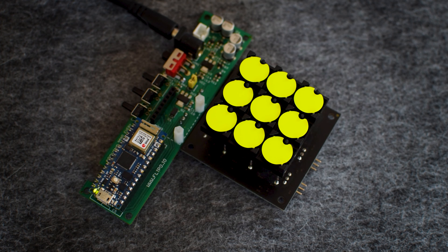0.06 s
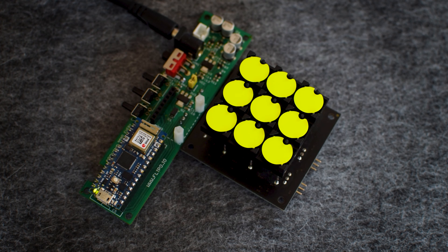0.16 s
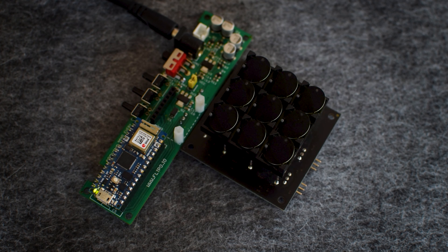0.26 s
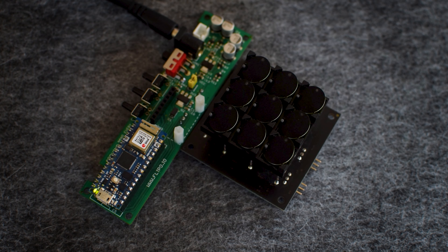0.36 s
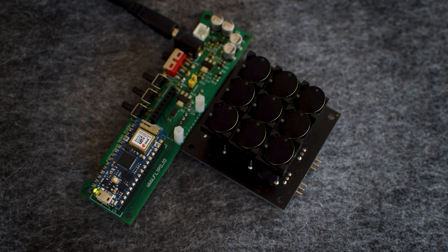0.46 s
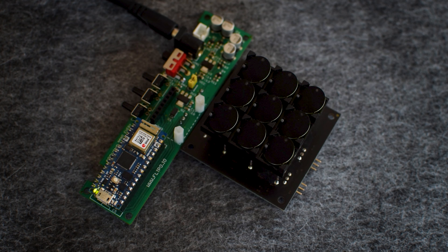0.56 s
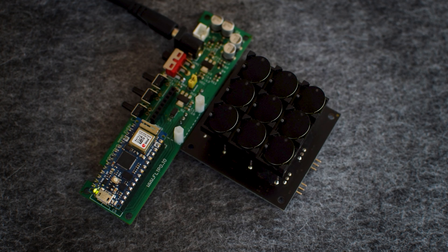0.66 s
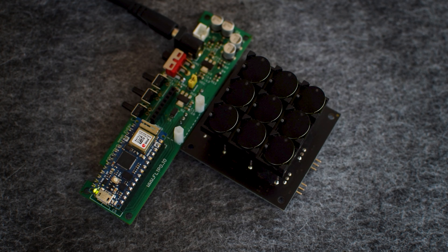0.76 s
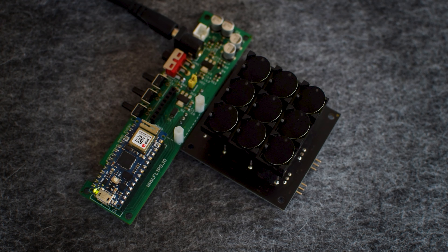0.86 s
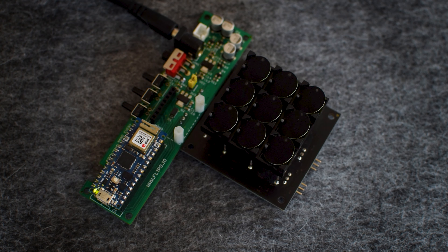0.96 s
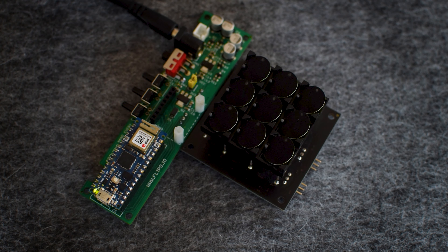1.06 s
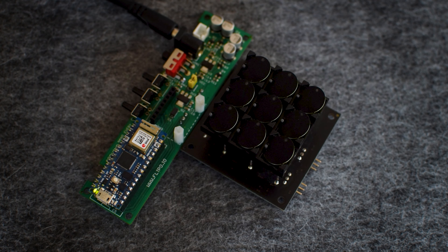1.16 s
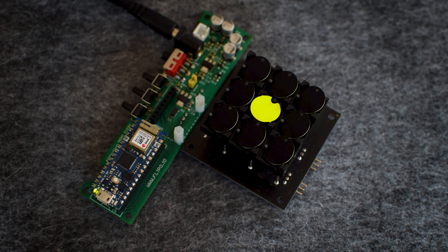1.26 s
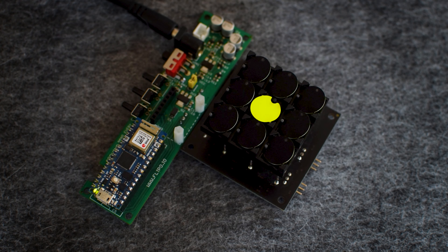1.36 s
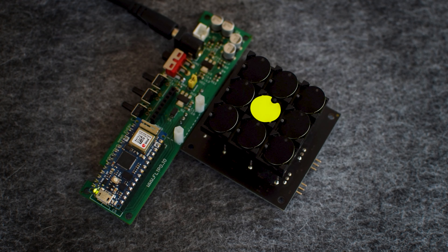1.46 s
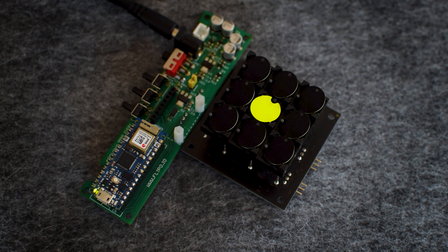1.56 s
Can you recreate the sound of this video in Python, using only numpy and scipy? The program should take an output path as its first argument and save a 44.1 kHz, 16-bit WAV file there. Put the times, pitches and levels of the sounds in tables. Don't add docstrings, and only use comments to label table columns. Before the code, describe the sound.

Close, dry stereo pickup in a quiet room: a fast ripple of soft ticks and louder plastic-metal slaps from nine little discs, a hissy pause of about a second, then one lone tick-clack.

```python
import sys
import numpy as np
from scipy import signal
from scipy.fft import rfft, irfft, next_fast_len
from scipy.io import wavfile

SR = 44100
rng = np.random.default_rng(int(sys.argv[2]) if len(sys.argv) > 2 else 0)


def unload_audio(sound):
    columns = np.transpose(np.atleast_2d(sound))
    steps = np.round(np.clip(columns, -1, 1) * 32767)
    wavfile.write(sys.argv[1], SR, steps.astype(np.int16))


def rack_gain(trim_db):
    fader = np.asarray(trim_db, float)
    return 10 ** (fader / 20)


N = 72765
BURST = SR // 8


def unit(x):
    return x / np.sqrt(np.mean(x ** 2) + 1e-20)


def along(points, hz):
    f, value = np.transpose(points)
    return np.interp(np.log(hz + 1), np.log(f + 1), value)


def filtered(x, response):
    size = next_fast_len(x.shape[-1] + 8192)
    spectrum = rfft(x, size) * response(np.fft.rfftfreq(size, 1 / SR))
    return irfft(spectrum, size)[..., :x.shape[-1]]


def add(out, s, sound):
    part = out[:, round(s * SR):][:, :sound.shape[1]]
    part += sound[:, :part.shape[1]]


def ports(n):
    mono_hz, side_share = 3800, .6
    mid, side = rng.standard_normal((2, n))
    side = filtered(side, lambda hz: side_share / np.sqrt(1 + (mono_hz / (hz + 1)) ** 8))
    return np.array([mid + side, mid - side])


def edge(x, over_db):
    edge_hz, slope_hz = 15800, 120

    def response(hz):
        return rack_gain(over_db / (1 + np.exp(np.clip((edge_hz - hz) / slope_hz, -30, 30))))

    return filtered(x, response)


def background():
    # f/Hz, level/dB per Hz
    hiss = [(12, -31), (22, 2.5), (36, -2), (50, 2), (75, -7.5), (300, -13.5), (390, -15.5), (650, -24.5),
            (16000, -39)]
    # f/Hz, correlation
    alike = [(60, 0.1), (240, 0.23), (950, 0.28), (3770, -0.016), (15000, 0.24)]
    # f/Hz, L-R/dB
    tilt = [(60, 4), (380, 0), (2380, 0), (15000, 0.5)]
    # t/s, length/s, f/Hz, width/Hz, level/dB
    far = [
        (0.019, 0.23, 363, 30.5, -74.5),
        (0.659, 0.085, 7200, 300, -86),
        (0.853, 0.097, 6400, 401.6, -85.5),
        (1.052, 0.0745, 6460, 300, -84.5),
    ]
    hiss_db = -65.5

    def mid_side(hz):
        angle = np.arccos(np.clip(along(alike, hz), -1, 1)) / 2
        return rack_gain(along(hiss, hz)) * [np.cos(angle), np.sin(angle)]

    mid, side = filtered(rng.standard_normal((2, N)), mid_side)
    pair = np.array([mid + side, mid - side])
    pair = filtered(pair, lambda hz: rack_gain(along(tilt, hz) * [[.5], [-.5]]))
    out = rack_gain(hiss_db) * pair / np.std(pair.mean(axis=0))
    t = np.arange(SR // 4) / SR
    for s, length, hz, width, db in far:
        noise = filtered(rng.standard_normal((1, len(t))), lambda f: np.exp(-((f - hz) / width) ** 2))
        swell = np.sin(np.pi * np.minimum(t / length, 1))
        add(out, s, rack_gain(db) * unit(noise) * swell)
    return out


def tail(x, decay, delay_s, tone):
    hz, t, z = signal.stft(ports(SR // 2), SR, nperseg=64)
    level_db = along(tone, hz)[:, None] - 60 * t / along(decay, hz)[:, None]
    answer = signal.istft(z * rack_gain(level_db), SR, nperseg=64)[1]
    answer = answer / np.linalg.norm(answer) * np.sqrt(2)
    answer = np.pad(answer, ((0, 0), (round(delay_s * SR), 0)))
    return signal.fftconvolve(x, answer, axes=1)[:, :N]


def space(x, broad):
    # delay/s, level/dB
    echoes = [
        (.0018, -19),
        (.0031, -20),
        (.0095, -26),
    ]
    # f/Hz, T60/s
    scatter = [(1000, 0.06), (4000, 0.042), (9000, 0.012), (16000, 0.025)]
    # f/Hz, T60/s
    room = [(500, 0.25), (3000, 0.15), (7000, 0.26), (11000, 0.21), (16000, 0.13)]
    # f/Hz, level/dB
    room_tone = [(800, -6), (3000, 2), (7000, -7), (16000, -3)]
    scatter_db, room_db = -11, -21
    out = x.copy()
    for s, db in echoes:
        for ch in (0, 1):
            add(out[ch:ch + 1], s + .00004 * ch, rack_gain(db) * x[ch:ch + 1])
    near = rack_gain(scatter_db) * tail(x, scatter, 0.0011, [(1000, 0)])
    return out + near + rack_gain(room_db) * tail(broad, room, 0.007, room_tone)


def ring(modes, ratio, attack_s, scatter_db, spread, detune=0, frame_db=0):
    disc_low_hz, disc_high_hz = 4600, 14000
    ratio = np.clip(ratio, .85, 1.12)
    spread_db = 4
    hz, db, t60 = np.transpose(modes)[:, :, None]
    t = np.arange(BURST) / SR
    draw = rng.standard_normal((4, len(hz), 1))
    apart = spread * (hz / 8000) ** 2 * np.array([1, -1])[:, None, None]
    low = hz < disc_low_hz
    level_db = db + frame_db * low + scatter_db * draw[0] + spread_db * apart * draw[1]
    gain = rack_gain(level_db - 60 * t / t60)
    tuned = np.where(~low & (hz < disc_high_hz), hz * ratio, hz) * (1 + detune * draw[3])
    waves = gain * np.sin(2 * np.pi * tuned * t + apart * draw[2])
    return waves.sum(axis=1) * (1 - np.exp(-(t / attack_s) ** 2))


def thump():
    # f/Hz, level/dB, T60/s
    table_modes = [(64, -56, 0.22), (135.2, -53, 0.19), (217, -55.5, 0.18), (300, -57.5, 0.27)]
    out = np.zeros((2, N))
    add(out, .256, ring(table_modes, 1, .008, scatter_db=0, spread=400))
    return out


def crack(hz, cycles):
    t = np.arange(BURST) / SR - cycles / hz
    snap = -np.cos(2 * np.pi * hz * t) * np.exp(-(t * hz / (0.62 * cycles)) ** 2)
    return signal.sosfilt(signal.butter(3, 2200, "high", fs=SR, output="sos"), snap)


def rattle(attack_s, t60, ratio):
    # f/Hz, level/dB per Hz
    pivot = [(1000, -48.5), (2200, -19.5), (3500, -1), (6000, -1.5), (9000, -0.5), (12000, -6),
             (15500, -4.5), (16300, -35.5)]
    t = np.arange(BURST) / SR
    noise = unit(filtered(ports(len(t)), lambda hz: rack_gain(along(pivot, hz / ratio))))
    return noise * rack_gain(-60 * t / t60) * (1 - np.exp(-(t / attack_s) ** 2))


def contacts(rows, modes, lone_modes, ring_db, attack_s, crack_db, crack_hz, board_db, rattle_db, t60,
             frame=None):
    # f/Hz, level/dB, T60/s
    board_modes = [(1165, -27.5, 0.072), (1412, -24.5, 0.041), (1482.6, -26.5, .06), (783, -50, 0.07),
                   (1703, -35, .025), (2000.6, -23, .025), (2283, -24.5, 0.04), (2883, -27.5, 0.008)]
    # f/Hz, level/dB, T60/s
    middle_modes = [(1385, -24, 0.022), (1128, -42, 0.02), (2467, -36, 0.016), (2894, -36, .012)]
    alone_s = 1
    dullest = .75
    ring_room_db = -9
    out, broad = np.zeros((2, 2, N))
    if frame is None:
        frame = np.zeros(len(rows))
    for (s, db, ratio, pan_db), frame_db in zip(rows, frame):
        many = s < alone_s
        detune = .025 * many
        disc = ring(modes if many else lone_modes, ratio, attack_s, 1 + 3 * many, .3, detune, frame_db)
        disc = rack_gain(ring_db) * disc
        board = ring(board_modes if many else middle_modes, 1, 0.0011, scatter_db=1.5, spread=1.5,
                     detune=detune / 2)
        board = rack_gain(board_db) * board
        pitch = max(ratio, dullest)
        pan = rack_gain(pan_db * np.array([[.5], [-.5]]))
        snap = rack_gain(crack_db) * crack(crack_hz * pitch, cycles=1.3)
        snap = snap + rack_gain(rattle_db) * rattle(attack_s, t60, pitch)
        add(out, s, rack_gain(db) * (board + pan * (disc + snap)))
        add(broad, s, rack_gain(db) * (snap + rack_gain(ring_room_db) * (disc + board)))
    return space(out, broad)


def discs():
    # t/s, level/dB, pitch ratio, L-R/dB
    kicks = [
        (.1995, -23, .95, 1.5),
        (.2012, -21, .9, 1.5),
        (.2036, -22, 1.03, 2),
        (.2052, -22, 0.98, 3),
        (.2064, -16, .97, 2),
        (.2079, -22, 0.97, 2.5),
        (.2092, -23, 1.05, 1.5),
        (.2107, -23, 1.12, 2),
        (.2121, -27, 1.06, 1),
        (1.2323, -20, 1.001, 2),
    ]
    # t/s, level/dB, pitch ratio, L-R/dB
    chatter = [(.2143, -32, 1.4, -0.5), (.2170, -34, 0.64, 1), (.2198, -31, 0.56, -0.1),
               (.2228, -33.5, 1.3, 0.5), (.2262, -34.5, 1.3, 1), (.2292, -34, 0.57, 1),
               (.2312, -34.5, 1.4, 0.3), (.2338, -40.5, 0.9, 2), (.2712, -19.5, 0.92, 2),
               (.2735, -23, 1.14, 0.5), (.2945, -36.5, 0.71, 3), (.2995, -39.5, 0.74, -0.5)]
    # t/s, level/dB, pitch ratio, L-R/dB
    slaps = [
        (.2548, -8.5, 1.03, 2),
        (.2573, -8, .97, 2),
        (.2585, -7.5, 1.05, 1.5),
        (.2596, -5.5, 1.04, 2.5),
        (.2619, -5, .96, 2),
        (.2634, -9.5, 1.02, 2),
        (.2659, -8, 1.06, 1.5),
        (.2666, -10.5, .95, 3),
        (.2687, -7, .98, 2),
        (1.2826, -5, 1, 1.5),
    ]
    # t/s, level/dB, pitch ratio, L-R/dB
    bounces = [
        (.2765, -26.5, 0.92, 2),
        (.2801, -19, 1.1, 3.5),
        (.2822, -25, 0.79, 1.5),
        (.2857, -28, 0.95, 2.5),
        (.2868, -21, .99, 1),
        (.2885, -28.5, 0.77, 2.5),
        (.2915, -28.5, .9, 0.5),
        (.3025, -42, 1.2, 2),
        (1.3054, -22, 1.05, 2.5),
        (1.3145, -39.5, 0.73, -3),
    ]
    # f/Hz, level/dB, T60/s
    kick_modes = [(3790, -3, 0.008), (4150, -7, 0.0076), (5060, -15, 0.016), (6090, -9.5, .012),
                  (7365, -17.5, 0.05), (7800, -2, .013), (9510, 0.5, .01), (10000, -3.5, 0.01),
                  (10810, -5, 0.018), (11570, -11.5, 0.01), (14300, -15.5, 0.009), (15350, -8.5, 0.0083)]
    # f/Hz, level/dB, T60/s
    lone_kick = [(1400, -20.5, 0.049), (3896, -3, 0.012), (4070, -3.5, 0.01), (5270, -14.5, 0.011),
                 (5820, -12.5, 0.014), (5900, -13.5, 0.012), (7330, -11, .04), (7450, -2.5, 0.016),
                 (7640, -12.5, 0.029), (9220, -6, 0.01), (9420, -0.5, 0.0096), (10660, -6.5, 0.012),
                 (10880, -6, 0.0092), (15500, 1, .01)]
    # f/Hz, level/dB, T60/s
    slap_modes = [(3330, -5.5, 0.013), (3600, -2.5, 0.01), (4400, -12, .008), (5540, -4.5, 0.011),
                  (6320, -3, 0.027), (7200, -1.5, 0.0073), (8260, 0.5, 0.022), (9178, -3, 0.0099),
                  (9070, -4.5, .007), (11950, -3.5, 0.015), (13270, -12, 0.01), (15200, -13.5, 0.0088)]
    # f/Hz, level/dB, T60/s
    face_modes = [(3208, -7, 0.013), (4340, -8.5, 0.008), (5310, -4.5, 0.0049), (5900, -3, 0.015),
                  (6430, -10.5, .01), (7870, -10, 0.007), (8400, -15, 0.0051), (9500, -21, 0.0096),
                  (10360, -5, 0.005), (11040, -1.5, 0.0074), (12200, -13, .01), (12900, -17, 0.0069),
                  (15200, -22, .008)]
    kick_frame = [2.5, -1.5, -1.5, 3, 0.5, -3.5, 0.5, 0.5, -3.5, -3.6]
    slap_frame = [2, 3, 6, 0, -3, -6, -4, -4, -1, 0]
    graze_s, graze_db = .0024, -23
    grazes = [(s - graze_s, db + graze_db, ratio, pan) for s, db, ratio, pan in slaps]
    out = contacts(kicks, kick_modes, lone_kick, ring_db=-0.06, attack_s=.00035, crack_db=-7.5,
                   crack_hz=7160, board_db=-6.5, rattle_db=-6.5, t60=0.014, frame=kick_frame)
    out += contacts(chatter, slap_modes, face_modes, ring_db=-16, attack_s=0.00036, crack_db=-10,
                    crack_hz=4060, board_db=0, rattle_db=-3.0, t60=0.0264)
    out += contacts(grazes, slap_modes, face_modes, ring_db=-14, attack_s=0.00028, crack_db=-10.5,
                    crack_hz=7000, board_db=-20, rattle_db=-11.5, t60=0.024)
    out += contacts(slaps, slap_modes, face_modes, ring_db=-15.5, attack_s=0.0002, crack_db=1.78,
                    crack_hz=8080, board_db=-7.5, rattle_db=-19, t60=.022, frame=slap_frame)
    out += contacts(bounces, slap_modes, face_modes, ring_db=-15, attack_s=0.0003, crack_db=1.5,
                    crack_hz=7405, board_db=-6.0, rattle_db=-13.5, t60=0.013)
    return out


def scene():
    quiet = edge(background(), over_db=-30)
    clicks = edge(discs(), over_db=-10.5)
    return quiet + thump() + clicks


def roll_off(x):
    return signal.sosfilt(signal.butter(12, 17000, fs=SR, output="sos"), x)


def record(dry):
    return roll_off(dry)


dry = scene()
out = record(dry)
unload_audio(out)
```